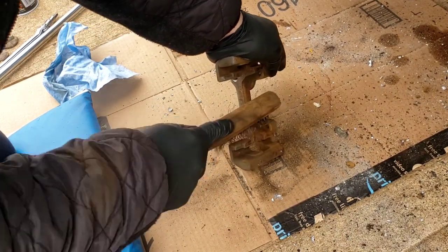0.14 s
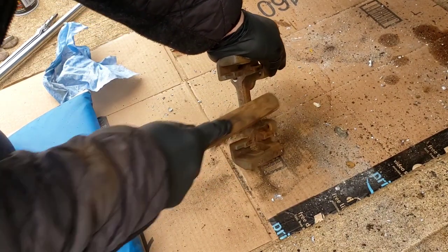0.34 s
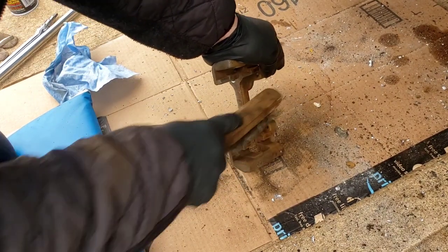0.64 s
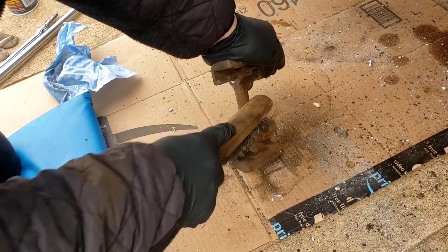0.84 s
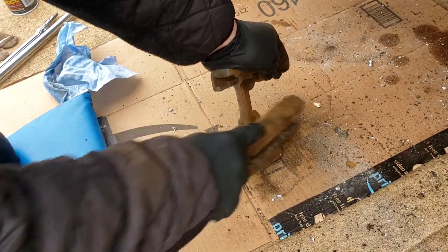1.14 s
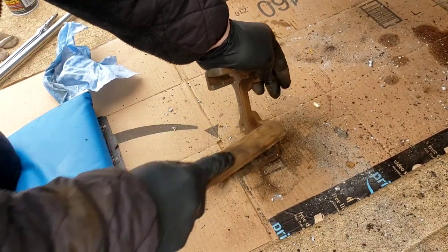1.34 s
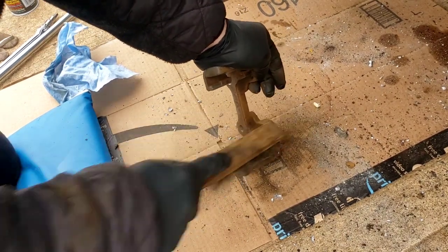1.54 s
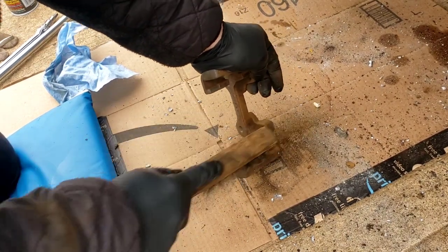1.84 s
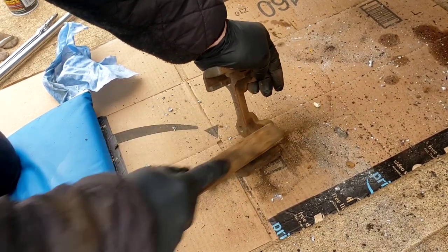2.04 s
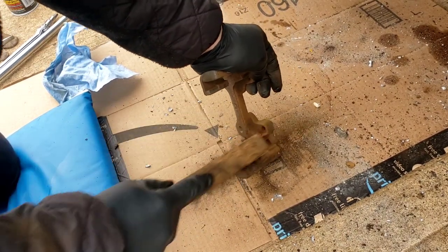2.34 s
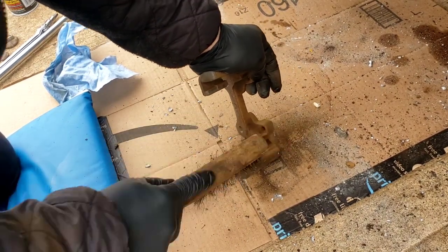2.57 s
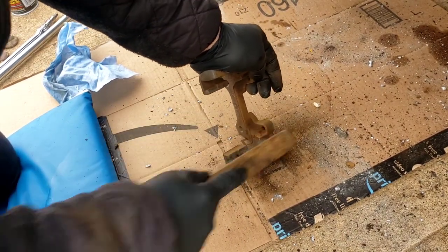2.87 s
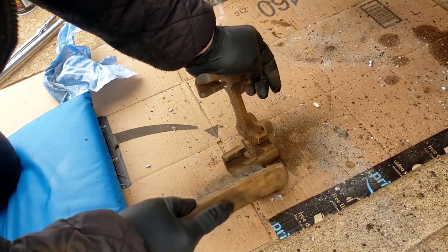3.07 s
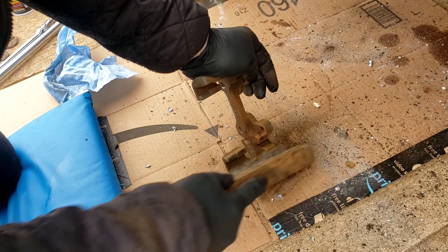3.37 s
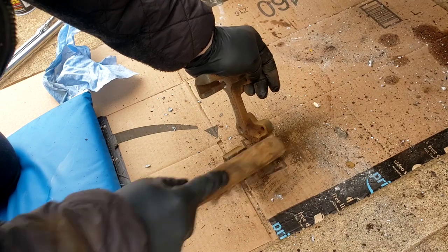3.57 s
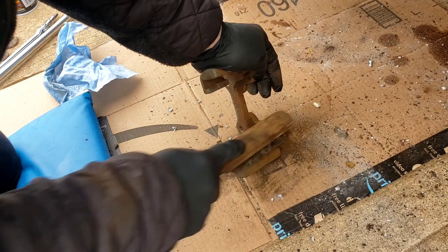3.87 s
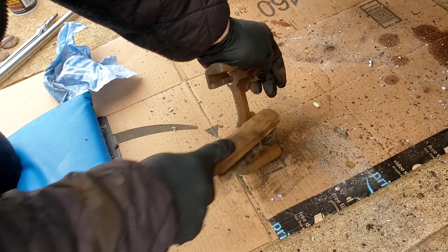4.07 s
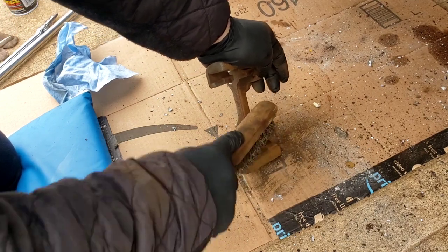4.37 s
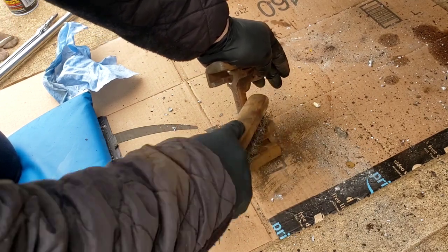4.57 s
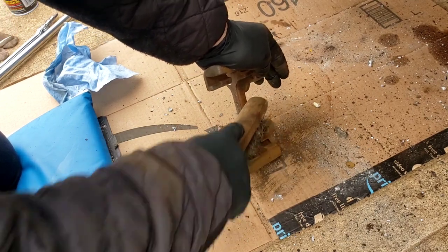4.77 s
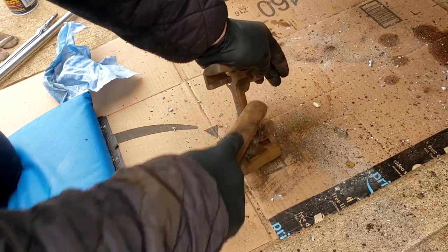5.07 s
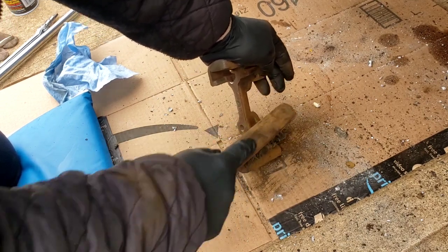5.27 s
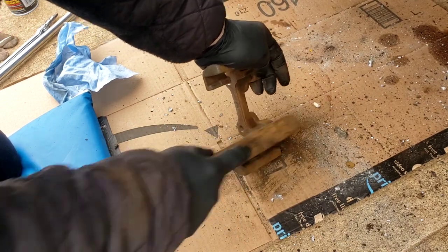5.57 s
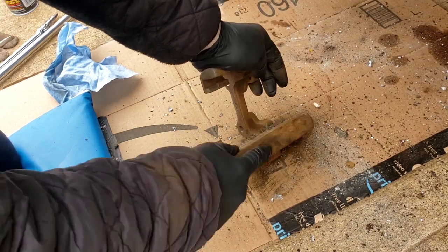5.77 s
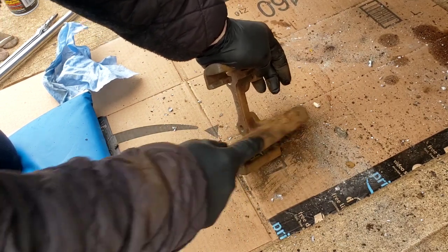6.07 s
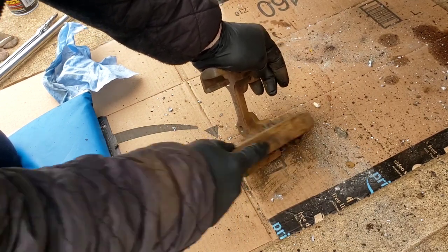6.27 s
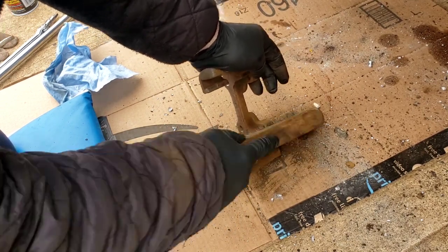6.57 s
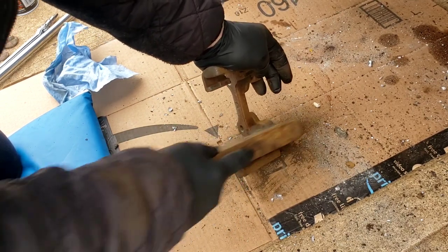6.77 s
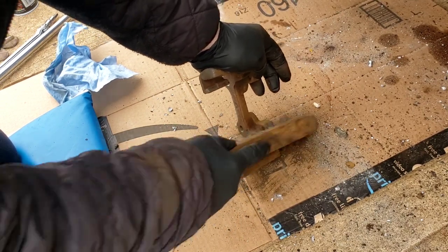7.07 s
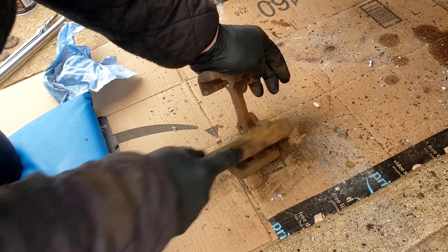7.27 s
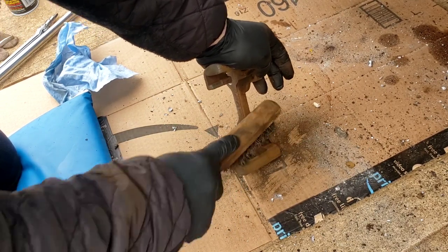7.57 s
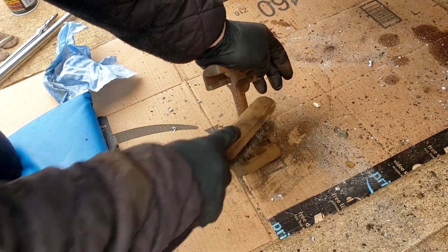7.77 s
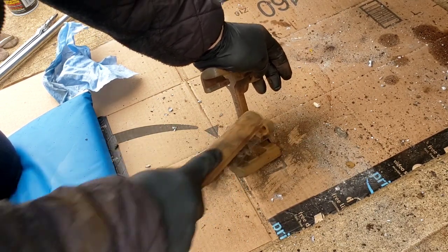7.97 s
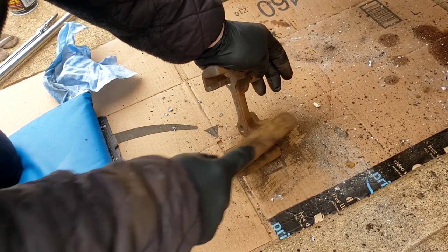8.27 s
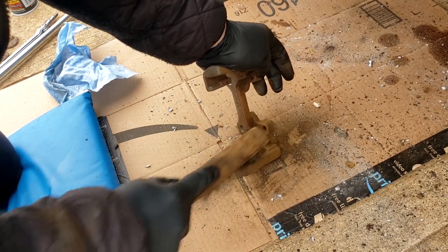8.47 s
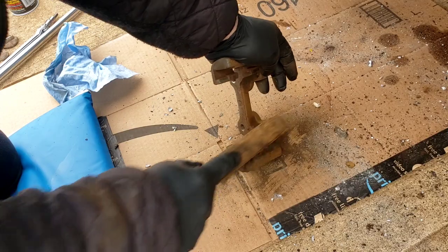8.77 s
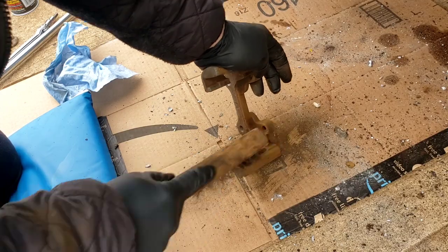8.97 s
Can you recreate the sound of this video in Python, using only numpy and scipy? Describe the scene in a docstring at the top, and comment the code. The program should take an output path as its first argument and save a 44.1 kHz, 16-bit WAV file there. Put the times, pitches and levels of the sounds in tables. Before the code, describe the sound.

In a garage with a short, dry echo, a stiff wire brush scrubs a rusty iron part on cardboard, close to the microphone, at about eight strokes a second without pause. From 0 to 1.3 s the scratches are light, with soft dull thuds and a tiny rising skid near 0.7 s. A sharp crack comes at 1.4 s, and the strokes grow loud, bright and raspy until about 2.7 s, ease, then peak again with coarse rasps at 3.3-3.6 s. From 4 to 5.4 s the brushing is thin and faint; a car passes outside as a hollow, wavering whoosh from about 4.2 to 5.8 s, strongest near 5.3. Vigorous gritty metallic scrubbing returns from 5.6 to 7.3 s, with cracks near 6.4 and 7.0. It softens around 8 s, then alternates stronger and weaker strokes to the end. Faint room tone and low rumble lie beneath.

```python
"""In a garage, a hand wire brush scrubs a rusty iron part lying on cardboard, about eight strokes a second.
Bristle tips slip at random; one hears them scratch, and ring the wires and the iron through resonances.
Tufts rasp in short bursts across edges, and some catch with a crack; the part thuds and skids once.
A car passes in the street outside, as two bands of noise, over a faint room tone and a low rumble."""
import sys
import numpy as np
from scipy import signal
from scipy.fft import rfft, irfft, next_fast_len
from scipy.io import wavfile
from scipy.ndimage import uniform_filter1d, map_coordinates

SR = 44100
rng = np.random.default_rng(int(sys.argv[2]) if len(sys.argv) > 2 else 0)


def inscribe(sig):
    """Save sig as 16-bit PCM at rate SR to the path in sys.argv[1].

    A 1-D sig is mono; a 2-D sig holds one channel per row.
    Samples are clipped to [-1, 1] before scaling.
    """
    pcm = np.round(np.clip(np.atleast_2d(sig).T, -1, 1) * 32767)
    wavfile.write(sys.argv[1], SR, pcm.astype(np.int16))


N = 402633
T = np.arange(N) / SR  # time of each sample, s

# resonances of the wire tufts: (f/Hz, width/Hz, level/dB)
TUFT_MODES = [(1314, 140, -8.5), (1612, 111, 1.5), (1815, 210, 6.5), (2074, 250, 4.5), (2338, 160, 5.5),
              (2870, 740, -6.5)]


def amp(db):
    """Turn decibels into a gain."""
    return 10 ** (np.asarray(db) / 20)


def unit(x):
    """Scale x to an rms of 1."""
    return x / np.sqrt(np.mean(x ** 2) + 1e-20)


def curves(rows, **ends):
    """Draw straight lines between table rows: one value per sample for each column after the time."""
    times, *columns = np.transpose(rows)
    return [np.interp(T, times, column, **ends) for column in columns]


def wobble(rate):
    """A smooth random curve with rate knots a second."""
    coarse = T[::32]  # the curve is slow, so every 32nd sample is enough
    knots = rng.standard_normal(int(N * rate / SR) + 4)
    return np.interp(T, coarse, map_coordinates(knots, [coarse * rate]))


def filtered(x, response):
    """Multiply the spectrum of x by a response, given as a function of frequency in Hz."""
    size = next_fast_len(N + 8192)
    spectrum = rfft(x, size) * response(np.fft.rfftfreq(size, 1 / SR))
    return irfft(spectrum, size)[:N]


def colour(points):
    """A tone colour: gain drawn through (f/Hz, level/dB) points on a log frequency axis."""
    f, level = np.transpose(points)
    return lambda hz: amp(np.interp(np.log(hz + 1), np.log(f + 1), level))


def modes(rows, order=1):
    """A sum of resonances with alternating signs; order 2 darkens the valleys between them."""
    def response(f):
        total = 0
        for k, (centre, width, db) in enumerate(rows):
            damping = 1j * f * width
            peak = damping / (centre * centre - f * f + damping)
            total = total + (-1) ** k * amp(db) * peak ** order
        return total
    return response


def ringing(x, rows, drift_db):
    """Send x through sharp resonances whose strengths drift from stroke to stroke, as the contact moves."""
    total = 0
    for hz, width, db in rows:
        peak = np.concatenate(signal.iirpeak(hz, hz / (1.33 * width), SR))
        twice = np.tile(peak, (2, 1))  # the same peak twice in a row
        total = total + amp(db + drift_db * wobble(9)) * signal.sosfilt(twice, x)
    return total


def patchy(x, depth_db):
    """Give x drifting patches of more and less gain across time and pitch."""
    z = signal.stft(x, nperseg=256)[2]
    field = uniform_filter1d(rng.standard_normal(z.shape), 5, axis=0)
    field = uniform_filter1d(field, 8, axis=1)
    return signal.istft(z * amp(depth_db * unit(field)), nperseg=256)[1][:N]


def slips(rate, spread_db, clump_db):
    """Wire tips let go at random, about rate a second, in varied sizes and clumps of a few milliseconds."""
    hit = rng.random(N) < rate / SR
    size = amp(spread_db * rng.exponential(size=N) + clump_db * wobble(220))
    return hit * size * rng.standard_normal(N)


def garage():
    """The room is a faint wavering tone of coloured noise and an uneven low rumble around 108 Hz."""
    # how loud the room is: (t/s, rumble level/dB, room tone level/dB)
    room_levels = [(0, -71.5, -60.5), (1.1, -66.5, -55.5), (1.7, -53.5, -45), (2.1, -72.5, -48),
                   (3.2, -56.5, -52.5), (5.85, -57.5, -53), (6.1, -63, -52.5), (7.3, -79, -49),
                   (7.6, -64, -53.5), (8.7, -61, -53)]
    # colour of the room tone: (f/Hz, level/dB)
    room_colour = [(120, -23), (230, -9), (400, 3), (950, -4.5), (1070, -18), (1350, 1.5), (1840, -7),
                   (5500, -52)]
    rumble_db, tone_db = curves(room_levels)
    tone = unit(patchy(filtered(rng.standard_normal(N), colour(room_colour)), depth_db=3.5))
    rumble = unit(filtered(rng.standard_normal(N), modes([(108, 153, 0)], order=2)))
    return amp(tone_db + 3.2 * wobble(6.1)) * tone + amp(rumble_db + 1.6 * wobble(3.9)) * rumble


def car():
    """Tyre roar is noise that reaches the garage as two wavering bands."""
    # the car passing: (t/s, upper band level/dB, lower band level/dB)
    passing = [(3.75, -74, -55), (4.2, -37.5, -48.5), (4.55, -42, -37), (4.66, -46.5, -44),
               (4.84, -36, -38.5), (5.24, -29, -41.5), (5.35, -30, -44.5), (5.55, -34.5, -52.5),
               (5.92, -54.5, -54.5)]
    # resonances that shape each band: (f/Hz, width/Hz, level/dB)
    upper_modes = [(807, 300, 3), (869, 110, 14), (1330, 35, -7.5)]
    lower_modes = [(355, 385, -5.5), (516, 119, 4)]
    upper_db, lower_db = curves(passing, left=-90, right=-90)
    upper = unit(filtered(rng.standard_normal(N), modes(upper_modes, order=2)))
    lower = unit(filtered(rng.standard_normal(N), modes(lower_modes, order=2)))
    return amp(upper_db + 2.2 * wobble(25)) * upper + amp(lower_db + 4.3 * wobble(25)) * lower


def walls(x):
    """Floor and walls answer with a short diffuse echo: noise that falls 60 dB in 89 ms."""
    t = np.arange(SR // 4) / SR
    tail = rng.standard_normal(len(t)) * amp(-60 * t / 0.089) * (t > .003)
    return signal.fftconvolve(x, tail / np.linalg.norm(tail))[:N]


def thuds():
    """The part rocks on the cardboard: soft grainy pushes into the cardboard's resonances."""
    # each push: (t/s, spread/s, level/dB)
    pushes = [(0.442, 0.027, -43.5), (0.70, 0.024, -34.5), (0.93, 0.019, -39.5), (1.13, 0.017, -45),
              (1.27, 0.0084, -40.5), (1.41, 0.038, -36), (1.66, 0.025, -37.5), (1.9, 0.025, -36),
              (2.147, 0.027, -38.5), (2.404, .03, -52.5), (2.667, 0.046, -47.5), (3.345, .03, -41.5),
              (3.447, 0.026, -47.5), (3.918, 0.039, -45), (5.727, .03, -47.5), (6.763, 0.023, -39),
              (7.031, 0.012, -48), (8.24, 0.036, -51.5), (8.487, 0.026, -45.5), (8.73, 0.051, -44),
              (9.01, 0.022, -50.5)]
    # resonances of the cardboard: (f/Hz, width/Hz, level/dB)
    cardboard = [(389, 75, 6), (670, 200, 4.5), (986, 265, -3.5)]
    push = sum(amp(db) * np.exp(-.5 * ((T - s) / spread) ** 2) for s, spread, db in pushes)
    grains = slips(1500, spread_db=1.0, clump_db=3.0)
    grainy = patchy(filtered(grains, modes(cardboard, order=2)), depth_db=2.5)
    return push * unit(grainy)


def skid():
    """The part skids on the cardboard: a rising tone made rough by a fast random wobble of its level."""
    # the slide: (t/s, pitch f/Hz, level/dB before the wobble)
    slide = [(.68, 600, -60), (.71, 683, -36), (.82, 974, -56)]
    hz, db = curves(slide)
    sliding = (T > slide[0][0]) & (T < slide[-1][0])
    return sliding * amp(db) * wobble(150) * np.sin(2 * np.pi * np.cumsum(hz) / SR)


def catches():
    """A stiff tuft catches and flies off: a bright crack with a short spray, and a knock on the tufts."""
    # single hard catches: (t/s, crack level/dB, knock against crack level/dB), both trimmed below
    hard_catches = [(0.6398, -15, 1.5), (1.4186, -3, -18), (1.8843, -17, 10), (3.3262, -17, 14.5),
                    (3.5491, -19.5, 15.5), (5.918, -24, -15), (6.434, -14, -32), (7.01, -8, -1.5),
                    (8.218, -24, -25), (8.722, -15, -13)]
    t = np.arange(SR // 10) / SR
    cracks, knocks = np.zeros(N + SR), np.zeros(N + SR)
    # a quick crack (60 dB in 14 ms) and a slower spray
    decay = amp(-60 * t / 0.014) + 0.41 * amp(-60 * t / 0.16)
    for s, crack_db, knock_db in hard_catches:
        burst = decay * rng.standard_normal(len(t))
        burst[:4] = 3, 3, -3, -3  # a sharp first kick
        cracks[round(s * SR):][:len(t)] += amp(crack_db - 8) * burst
        knocks[round(s * SR):][:len(t)] += amp(crack_db + knock_db + 4.5) * burst
    bright = signal.lfilter(*signal.butter(2, [1800, 13000], "band", fs=SR), cracks[:N])
    return bright + filtered(knocks[:N], modes(TUFT_MODES))


def edges():
    """Tufts snap over an edge: coarse bursts of slips ring the tufts' resonances."""
    # tufts crossing an edge: (t/s, spread/s, rasp level/dB against the other rasps)
    crossings = [(0.247, 0.0098, -39.5), (0.443, 0.013, -34.5), (0.477, 0.02, -31.5), (0.673, 0.0089, -26),
                 (0.695, 0.019, -31.5), (0.915, 0.022, -34.5), (0.943, 0.0067, -31), (1.138, 0.02, -38.5),
                 (1.385, 0.02, -25.5), (1.422, 0.0095, -19), (1.632, 0.019, -17), (1.675, 0.019, -31),
                 (1.879, 0.021, -14), (1.925, 0.02, -26.5), (2.14, 0.022, -14), (2.175, 0.016, -28),
                 (2.394, 0.016, -16.5), (2.657, 0.03, -25), (2.901, 0.03, -20.5), (3.162, 0.013, -33),
                 (3.338, 0.025, -9.5), (3.437, 0.027, -19.5), (3.463, 0.0032, -29), (3.554, 0.031, -15),
                 (3.599, 0.023, -11.5), (3.649, 0.011, -16.5), (3.908, 0.027, -33), (5.719, 0.024, -28.5),
                 (5.98, 0.025, -16), (6.508, 0.025, -24.5), (6.752, 0.02, -10.5), (7.023, 0.017, -12),
                 (7.283, 0.028, -21)]
    rasp = np.zeros(N)
    for s, spread, db in crossings:
        near = slice(max(round((s - .2) * SR), 0), round((s + .2) * SR))
        late = T[near] - s
        steepness = np.where(late < 0, .6, .4)  # rises faster than it falls
        rasp[near] += amp(db) / (1 + (late / spread) ** 2 * steepness) ** 3.8
    snaps = unit(slips(4000, spread_db=1.5, clump_db=3.0))
    rasps = filtered(rasp * snaps, modes(TUFT_MODES, order=2))
    return amp(-1.0) * rasps * np.std(rasp) / np.std(rasps)


def stroke_level():
    """Scratch level in dB, and 1 during pulls: the hand speeds up from each turn and slows into the next."""
    # push and pull in turn, a push first: (turn of the hand t/s, fastest moment t/s, scratch there level/dB)
    strokes = [(0.0, -0, -41.5), (0.032, 0.102, -49), (0.147, 0.199, -44.5), (0.26, 0.322, -47.5),
               (0.367, 0.429, -40), (0.495, 0.534, -41), (0.608, 0.648, -32), (0.73, 0.787, -43),
               (0.819, 0.901, -37.5), (0.95, 1.044, -44), (1.068, 1.135, -33), (1.178, 1.267, -41.5),
               (1.282, 1.381, -31), (1.417, 1.47, -34), (1.55, 1.643, -29.5), (1.677, 1.746, -29.5),
               (1.795, 1.871, -20.5), (1.931, 1.998, -29), (2.04, 2.131, -21.5), (2.203, 2.235, -30.5),
               (2.305, 2.369, -20.5), (2.427, 2.499, -33.5), (2.548, 2.617, -25), (2.69, 2.737, -34.5),
               (2.789, 2.867, -29), (2.951, 2.965, -37), (3.045, 3.1, -35.5), (3.182, 3.215, -35.5),
               (3.286, 3.339, -21), (3.402, 3.459, -30), (3.514, 3.591, -17.5), (3.638, 3.678, -37),
               (3.755, 3.836, -35.5), (3.92, 3.973, -35), (4.03, 4.103, -31.5), (4.156, 4.22, -41),
               (4.254, 4.326, -40), (4.392, 4.436, -43.5), (4.474, 4.532, -39.5), (4.59, 4.657, -47),
               (4.69, 4.753, -45), (4.81, 4.878, -45), (4.92, 4.966, -42), (5.012, 5.093, -42.5),
               (5.148, 5.173, -41.5), (5.223, 5.328, -42), (5.351, 5.437, -32), (5.493, 5.542, -39),
               (5.601, 5.686, -25), (5.745, 5.814, -29), (5.873, 5.935, -18.5), (6.021, 6.072, -25.5),
               (6.134, 6.204, -20), (6.267, 6.354, -29), (6.395, 6.454, -18), (6.525, 6.593, -26),
               (6.651, 6.741, -18.5), (6.805, 6.868, -25.5), (6.913, 7.006, -27.5), (7.063, 7.127, -26),
               (7.168, 7.279, -29), (7.307, 7.373, -32.5), (7.438, 7.509, -26.5), (7.548, 7.62, -35.5),
               (7.662, 7.75, -36.5), (7.79, 7.856, -44.5), (7.898, 7.962, -42.5), (7.995, 8.092, -42),
               (8.143, 8.22, -32), (8.267, 8.3, -42), (8.396, 8.496, -25.5), (8.522, 8.615, -39),
               (8.666, 8.744, -23.5), (8.798, 8.873, -42), (8.923, 9.019, -30), (9.076, 9.117, -39)]
    last_stroke_s = 0.097  # from its turn to its end
    speed_power = 2.46  # scratch grows as speed to this power
    turn, fast, fast_db = np.transpose(strokes)
    pull = np.arange(len(turn)) % 2
    last = len(turn) - 1
    knots = np.append(np.column_stack([turn, fast]).ravel(), turn[-1] + last_stroke_s)
    place = np.interp(T, knots, np.arange(len(knots)))  # even at a turn, odd at a fastest moment
    growth = np.abs(np.sin(np.pi / 2 * place)) ** speed_power
    # scratch at a turn follows the softer stroke beside it; the hand rests more before a push
    before = np.append(fast_db[0], fast_db[:-1])
    turn_db = 0.74 * np.minimum(before, fast_db) - 21 - 4 * (1 - pull)
    rest = amp(turn_db[np.minimum(np.round(place / 2).astype(int), last)])
    top = amp(fast_db[np.minimum(place // 2, last).astype(int)])
    level_db = 20 * np.log10(rest + (top - rest) * growth)
    return level_db, np.interp(T, fast, pull)


def spots():
    """The brush wanders over the part: each ringing level holds at a spot and glides to the next."""
    # spots scrubbed in turn, and what rings there against scratch, before bristles() adjusts it:
    # (from t/s, body level/dB, short wires level/dB, arm level/dB, long wires level/dB, foot level/dB)
    scrubbed = [(0, 5.5, -20, -8.5, -5.5, -22), (1.4, -1.5, -9.5, -15, -4, -10),
                (2.7, -6, -12.5, -40, -8, -21), (3.7, 1.5, -10.5, -2.5, -2, 3),
                (4.4, 0.5, -25, -14, -3.5, -9), (5.0, -7, -17, -22, -6.5, -16),
                (5.55, -4, -8, -13.5, -9.5, -15), (6.65, 2.5, -5, -6.5, -5, -20),
                (7.6, -1.5, -22, -26, -2, -13), (8.3, -2, -11.5, -24, -12, -18)]
    move_s = 0.49  # time the glide takes
    start, *levels = np.transpose(scrubbed)
    here = np.searchsorted(start[1:], T)
    return uniform_filter1d(np.array(levels)[:, here], size=round(move_s * SR) + 1, axis=1)


def bristles():
    """The same slips are heard directly, through the wires' own ringing and through the iron."""
    # colour of the bare scratch of the tips: (f/Hz, level/dB)
    tip_colour = [(1500, -16), (2600, -5), (4600, -1), (5000, 4.5), (6500, 4.5), (14300, -1.5)]
    # resonances of iron body, short wires, iron arm, long wires and iron foot:
    # each (f/Hz, width/Hz before ringing() widens it by a third, level/dB)
    body = [(3472, 190, 16.5), (3778, 440, 22), (4053, 360, 10)]
    short_wires = [(7816, 1000, 6), (14480, 52, 5.5)]
    arm = [(5350, 690, -1), (5830, 510, 4), (6516, 260, 1)]
    long_wires = [(2520, 750, -2.5), (3128, 540, -3.5)]
    foot = [(4260, 420, 0)]
    level_db, pulling = stroke_level()
    body_db, short_db, arm_db, long_db, foot_db = spots()
    ring_db = body_db - 6.5 * pulling  # the iron body rings less on the way back
    scale = amp(level_db)
    drive = scale * amp(2.3 * wobble(35)) * slips(20000, spread_db=-0.3, clump_db=1.5)

    def steady(x):
        """Set the overall level of x so that it sits at the scratch level."""
        return scale * unit(x / scale)

    sound = amp(1.0) * steady(patchy(filtered(drive, colour(tip_colour)), depth_db=2.5))
    # strokes that stir the iron little leave the wires freer to sing
    levels = [ring_db, short_db - 0.094 * ring_db, arm_db, long_db - 0.18 * ring_db, foot_db]
    for db, rows in zip(levels, [body, short_wires, arm, long_wires, foot]):
        sound += amp(db) * steady(ringing(drive, rows, drift_db=4))
    # thin wires radiate no bass
    return signal.sosfilt(signal.butter(3, 2100, "high", fs=SR, output="sos"), sound)


def scene():
    """Add up the room, the street, and the brush with its echo."""
    brush = thuds() + skid() + catches() + edges() + bristles()
    return (garage() + car() + amp(-9) * walls(brush) + brush)[None]


def record(dry):
    """Round off the highest peaks and keep nothing above the band limit."""
    top_hz = 14550
    rounded = dry[0] / (1 + np.abs(dry[0] / .98) ** 8) ** .125
    return filtered(rounded, lambda hz: hz < top_hz)[None]


dry = scene()
out = record(dry)
inscribe(out)
```